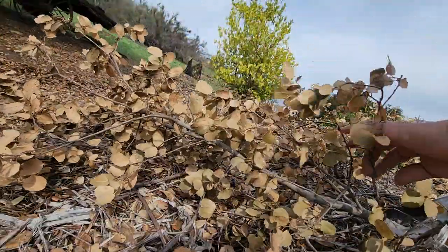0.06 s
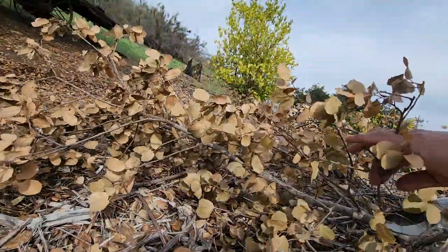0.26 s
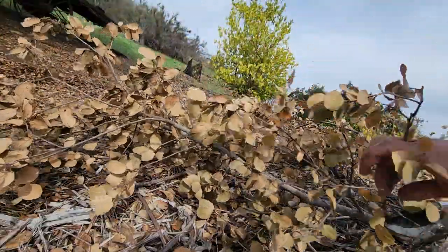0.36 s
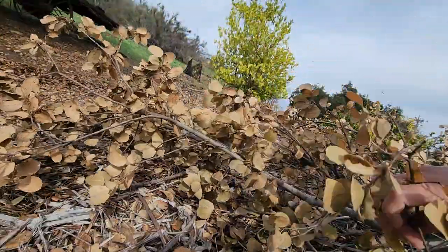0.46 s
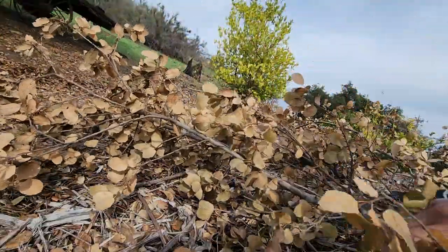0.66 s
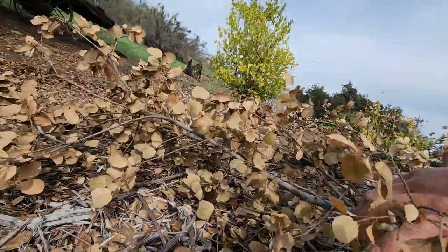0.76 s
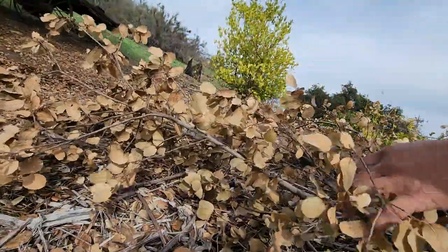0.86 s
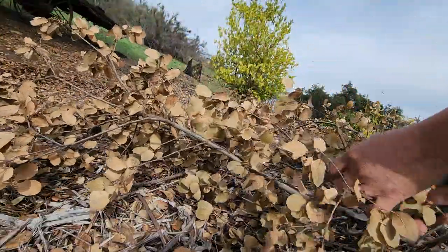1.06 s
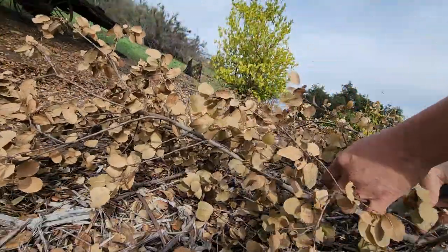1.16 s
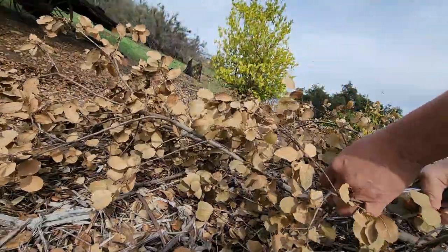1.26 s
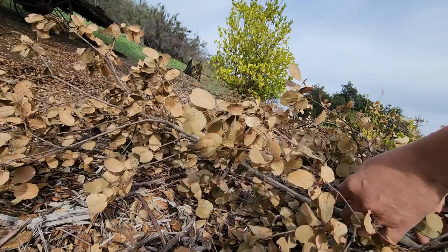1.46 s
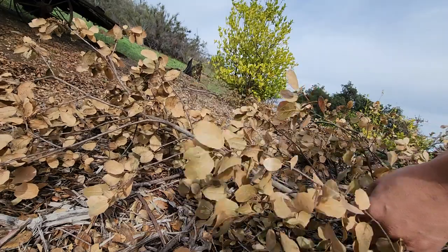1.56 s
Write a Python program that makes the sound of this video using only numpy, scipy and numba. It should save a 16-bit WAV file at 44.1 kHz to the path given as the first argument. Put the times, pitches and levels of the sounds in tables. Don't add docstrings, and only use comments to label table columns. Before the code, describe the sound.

Hand pruners work close by, slightly right, outdoors. Dry leaves rustle throughout in uneven stirs. A thin metallic squeak at 0.15-0.26 seconds ends in a click and tiny chirp near 0.3; a very sharp, bright snip cracks a twig at 0.39. A faint spring chirp follows around 0.63. A louder squeak at 1.11-1.17 ends in a snap, then light knocks and crackles, over faint distant rumble and soft wind puffs.

```python
import sys
import numpy as np
from scipy import signal
from scipy.fft import rfft, irfft
from scipy.io import wavfile
from scipy.ndimage import uniform_filter1d
from numba import njit

SR = 44100
rng = np.random.default_rng(int(sys.argv[2]) if len(sys.argv) > 2 else 0)


def to_wav(sig):
    pcm = np.clip(np.atleast_2d(sig), -1, 1) * 32767
    pcm = np.round(pcm).astype(np.int16)
    wavfile.write(sys.argv[1], SR, pcm.T)


def voltage_ratio(decibels):
    exponent = np.asarray(decibels, float) / 20
    return 10 ** exponent


N = 70560
T = np.arange(N) / SR
TOP_HZ = 15850

# frequency_hz, density_db (per Hz)
LEAF_SPECTRUM = [(160, -32), (280, -7), (631, -3.5), (760, -5), (1330, -1), (2940, -3.5), (7470, 0.5),
                 (15200, -3.5), (16000, 11.5)]
# time_s, level_db
LEAF_STIR = [(0, -47), (.07, -53), (.081, -56), (.09, -51.5), (.15, -50.5), (.255, -61), (.263, -68),
             (.282, -59.5), (.29, -41.5), (.37, -55), (.42, -45.5), (.55, -55), (.6, -45.5), (.72, -55.5),
             (.74, -66), (.79, -61), (.82, -59), (.9, -56.5), (.95, -59), (1.07, -54.5), (1.19, -48),
             (1.25, -58.5), (1.3, -55.5), (1.42, -58), (1.5, -48), (1.6, -49.5)]
# frequency_hz, density_db (per Hz)
RUMBLE_SPECTRUM = [(12, -34), (20, 4), (119, 3), (239, -10.5), (275, -19.5), (400, -26), (520, -72),
                   (880, -120)]
# time_s, level_db
RUMBLE_SWELL = [
    (0, 3.5),
    (.2, -2),
    (.45, 1.5),
    (.65, -1),
    (.95, -0.5),
    (1.1, 1.5),
    (1.3, -1),
    (1.6, -1),
]
# centre_s, left_peak_db, swing_hz, length_ms
PUFFS_AND_THUDS = [(.83, -42, 60, 14), (.92, -46, 50, 30), (1.1495, -29, 62, 9), (.404, -41, 150, 5),
                   (.3, -44, 150, 9), (.134, -42, 110, 12), (.98, -47, 155, 14), (.29, -50, 380, 5),
                   (.137, -53, 640, 5), (1.01, -60, 720, 7), (1.508, -52, 1300, 4), (1.366, -56, 2200, 5)]
# start_s, level_db, centre_hz, length_ms
LEAF_CRACKS = [(.0858, -43, 7150, 3.1), (.0914, -28.5, 9440, 1.87), (.3313, -38.5, 7400, 3),
               (.404, -49.5, 4250, 14), (.4195, -39, 7500, 4.4), (.4595, -42, 5770, 4.06),
               (1.005, -46, 6000, 2.9), (1.0635, -51.5, 3200, 3.4), (1.21, -51.5, 9000, 25),
               (1.3054, -48, 7960, 4.5), (1.3877, -47, 6800, 2), (1.4511, -52.5, 3250, 5.4),
               (1.471, -36, 6340, 1.3), (1.507, -56, 10000, 4.3), (1.58, -42, 6900, 3.2)]
# start_s, level_db, centre_hz, length_ms
HAND_SNAPS = [(.1262, -38, 10500, 8.4), (.134, -45, 2900, 6.9), (.166, -44, 6100, 3.7),
              (.24, -49, 9000, 22), (.381, -46, 4160, 17), (.285, -33, 8140, 8.8), (.296, -50, 4660, 11.5),
              (.3928, -43, 4250, 7.4), (.3952, -28, 6940, 1.9), (.5756, -48.5, 5430, 9.9),
              (.816, -50.5, 7740, 7.4), (.8695, -46, 6550, 6.4), (1.159, -26, 9000, 5),
              (1.173, -47, 6130, 4), (1.3508, -50, 8750, 5.9)]
# time_s, pitch_hz, level_db, third_partial_db, left_minus_right_db
PIVOT_OPENING = [
    (.15, 4680, -60, -20, -6),
    (.168, 4585, -32, -24, -6),
    (.184, 4830, -31, -13, -6),
    (.203, 4550, -31, -22, -8),
    (.211, 4450, -23, -21, -10),
    (.222, 4620, -28, -25, -7),
    (.241, 4580, -29, -21, -7),
    (.2465, 4570, -23, -26, -7),
    (.262, 4700, -58, -12, -6),
]
PIVOT_CATCH = [
    (.2955, 4900, -55, -16, -14),
    (.297, 4900, -33, -16, -12),
    (.2985, 4950, -42, -16, -10),
    (.302, 4880, -31, -14, -8),
    (.3035, 4950, -38, -14, -8),
    (.3055, 5050, -33, -12, -10),
    (.309, 5150, -42, -12, -12),
    (.319, 5220, -58, -10, -14),
]
PIVOT_CLOSING = [
    (1.11, 4440, -66, -18, -14),
    (1.114, 4460, -31, -18, -15),
    (1.128, 4660, -28, -32, -15),
    (1.142, 4480, -29, -16, -14),
    (1.147, 4390, -21, -12, -10),
    (1.158, 4440, -25, -30, -8),
    (1.161, 4700, -20, -40, -10),
    (1.1627, 4720, -10, -40, -11),
    (1.167, 4800, -30, -30, -12),
    (1.18, 4880, -52, -20, -8),
]
# time_s, level_db (relative to the first)
PIVOT_SECOND = [
    (.165, -27),
    (.18, -14),
    (.196, -19.5),
    (.207, -31),
    (.226, -32),
    (.255, -23),
    (.29, -26),
    (1.11, -21),
    (1.144, -13),
    (1.15, -29),
]
# time_s, mode_hz, level_db, left_minus_right_db
SQUEAL_FIRST = [
    (.376, 15520, -55, -30),
    (.379, 15600, -38, -30),
    (.3812, 15450, -43, -30),
    (.3885, 15450, -21, -11),
    (.3903, 15520, -25, -8),
    (.3936, 15480, -1, -18),
    (.3945, 14700, -20, -3),
    (.397, 15550, -21, -13),
    (.404, 15500, -46, -3),
]
SQUEAL_SECOND = [
    (1.143, 13250, -50, -10),
    (1.147, 13190, -27, -9),
    (1.157, 13285, -24, -7),
    (1.1612, 13200, -24, -7),
    (1.1643, 13090, -14, -11),
    (1.167, 13160, -38, -2),
    (1.176, 13200, -52, -2),
]
# time_s, pitch_hz, level_db
WOOD_BITE = [
    (.379, 1800, -56),
    (.386, 1910, -39),
    (.39, 2300, -41),
    (.393, 1850, -33),
    (.396, 2000, -25),
    (.399, 2400, -37),
    (.404, 2600, -52),
]
# time_s, mode_hz, level_db, left_minus_right_db
FAINT_OPENING = [
    (.198, 13150, -66, -8),
    (.211, 13400, -40, 0),
    (.222, 13150, -56, -8),
    (.25, 13300, -50, -15),
    (.26, 13100, -66, -8),
]
FAINT_CLOSING = [
    (1.112, 13300, -60, -10),
    (1.115, 13400, -42, -10),
    (1.121, 13200, -58, -12),
    (1.143, 13250, -52, -10),
]
# time_s, pitch_hz, level_db, left_minus_right_db
BLADE_GLIDE = [
    (1.1595, 10300, -45, -8),
    (1.161, 10250, -28, -8),
    (1.1628, 9500, -31, -8),
    (1.1648, 9050, -25, -8),
    (1.169, 9000, -50, -8),
]
# time_s, pitch_hz, level_db
SPRING_HIGH = [
    (.614, 7260, -66),
    (.62, 7230, -45),
    (.625, 7200, -64),
    (.637, 7130, -52),
    (.648, 7000, -49),
    (.657, 6930, -68),
]
SPRING_LOW = [
    (.63, 2250, -66),
    (.635, 2230, -52),
    (.643, 2150, -66),
]
# start_s, level_db
TWIG_BLOWS = [
    (.3927, -33),
    (.3953, -24),
    (.3966, -38),
    (.2853, -38),
    (1.3, -37),
]
# mode_hz, level_db, t60_s
TWIG_MODES = [(230, -12, .04), (470, -14, .016), (660, -15, .014), (1720, 2, .018), (2550, -6, .025),
              (3000, -6, .014), (3480, -3, .016), (4150, -4, .018), (5170, -6, .015), (6185, -14, .014),
              (7375, -3, .014), (9300, -9, .013), (12600, -9, .014), (14000, 2, .016)]


def level(x, db):
    return x * voltage_ratio(db) / np.sqrt(np.mean(x ** 2))


def curve(table, hz):
    table_hz, table_db = np.array(table).T
    return np.interp(np.log(np.minimum(hz, TOP_HZ - 900)), np.log(table_hz), table_db)


def over_time(table):
    return np.interp(T, *np.array(table).T)


def colour(x, gain):
    return irfft(rfft(x) * gain(np.maximum(np.fft.rfftfreq(N, 1 / SR), 1)), N)


def delay(x, lag_ms):
    return colour(x, lambda f: np.exp(-2j * np.pi * f * lag_ms / 1000))


def walk(rate_hz):
    hold = int(SR / rate_hz)
    steps = np.repeat(rng.standard_normal(N // hold + 1), hold)
    return 1.3 * uniform_filter1d(uniform_filter1d(steps, hold), hold)[:N]


@njit
def grains(at, hz, cycles, size, length, rate):
    out = np.zeros(length)
    for k in range(len(at)):
        turn = np.exp((2j * np.pi - 2 / cycles) * hz[k] / rate)
        z = size[k] + 0j
        for i in range(max(int(at[k]), 0), min(int(at[k] + 3 * cycles * rate / hz[k]), length)):
            out[i] += z.imag
            z *= turn
    return out


def leaf_ticks(patch_db, count=14000):
    u = rng.random((3, count))
    lag, shade = rng.standard_normal((2, count))
    at = u[0] * N
    hz = 300 * 54 ** u[1]
    scatter_db = -3 * np.log(1 - .997 * u[2])
    db = curve(LEAF_SPECTRUM, hz) + 20 * np.log10(hz) + scatter_db + patch_db[at.astype(int)]
    ports = []
    for side in (1, -1):
        size = np.sign(lag) * voltage_ratio(db + side * 2.5 * shade)
        ports.append(grains(at + 12 + side * 5 * lag, hz, 6, size, N, 1. * SR))
    return np.array(ports)


def leaf_hiss(patch_db):
    hiss = 0
    for centre in 350 * 2 ** np.arange(0, 5.6, .5):
        like = np.clip(700 / centre, .1, .7)
        mid, side = rng.standard_normal((2, N))
        pair = np.sqrt(1 + like) * mid + np.sqrt(1 - like) * side * np.array([[1], [-1]])

        def band_gain(f):
            octaves = np.clip(np.log2(f / centre), -.5, .5)
            return voltage_ratio(curve(LEAF_SPECTRUM, f)) * np.clip(np.cos(np.pi * octaves), 0, 1)

        flicker_db = 2.4 * walk(35)
        hiss = hiss + colour(pair, band_gain) * voltage_ratio(flicker_db + patch_db * .7)
    return hiss


def leaves():
    patch_db = 2 * walk(75.0)
    rustle = level(leaf_ticks(patch_db), -3.5) + level(leaf_hiss(patch_db), -3)
    return rustle * voltage_ratio(over_time(LEAF_STIR))


def rumble():
    noise = rng.standard_normal((2, N))
    mid, side = colour(noise, lambda f: voltage_ratio(curve(RUMBLE_SPECTRUM, f)) * (f > 18) * (f < 450))
    pair = mid + voltage_ratio(-14.5) * side * np.array([[1], [-1]])
    return level(pair * voltage_ratio(2 * walk(6.15) + over_time(RUMBLE_SWELL)), -52.5)


def puffs_and_thuds():
    left = np.zeros(N)
    for centre_s, peak_db, hz, ms in PUFFS_AND_THUDS:
        t = T - centre_s
        left -= voltage_ratio(peak_db) * np.exp(-(t * 1000 / ms) ** 2) * np.cos(2 * np.pi * hz * t)
    return left * voltage_ratio(np.array([[0], [-6.]]))


def cracks(table, pan_db, lag_ms, count=200):
    tab = np.array(table)[:, :, None]
    start_s, level_db, centre_hz, length_ms = (tab[:, k] for k in range(4))
    u = rng.random((len(tab), count))
    g = rng.standard_normal((len(tab), 4, count))
    at = (start_s - length_ms / 2000 * np.log(1 - .98 * u)) * SR
    hz = np.clip(centre_hz * 2 ** (.85 * g[:, 0]), 500, 17500)
    db = level_db + 3.5 * g[:, 1] - 10 * np.log10(count / length_ms / 8)
    db = db + 4 * np.log2(hz / centre_hz)
    shade_db = pan_db / 2 + 1.5 * g[:, 2]
    lag = lag_ms / 1000 * SR + 1.9 * g[:, 3]
    ports = []
    for side in (1, -1):
        arrival = at + lag * (side > 0)
        size = np.sign(g[:, 3]) * voltage_ratio(db + side * shade_db)
        ports.append(grains(arrival.ravel(), hz.ravel(), 4, size.ravel(), N, 1. * SR))
    return colour(np.array(ports), lambda f: f / np.hypot(f, 1000))


def squeak(table, lag_ms, partials=False, rough=0.97):
    tab = np.array(table)

    def column(k):
        return np.interp(T, tab[:, 0], tab[:, k])

    jitter = 1 + rough * .008 * walk(540)
    phase = 2 * np.pi * np.cumsum(column(1) * jitter) / SR
    tone = np.sin(phase)
    if partials:
        second_db = over_time(PIVOT_SECOND) + 3.5 * walk(90)
        third_db = column(3) + 3.5 * walk(200)
        tone = tone + voltage_ratio(second_db) * np.sin(2 * phase) + voltage_ratio(third_db) * np.sin(3 * phase)
        hiss = colour(rng.standard_normal(N), lambda f: np.exp(-np.log2(f / 9000) ** 2))
        tone = tone + level(hiss, -28) * voltage_ratio(2.3 * walk(150))
    sounding = (T > tab[0, 0]) * (T < tab[-1, 0])
    shimmer_db = rough * 1.2 * walk(600)
    right = np.sqrt(2) * tone * voltage_ratio(column(2) + shimmer_db) * sounding
    shade_db = column(-1) if tab.shape[1] > 3 else -2.2
    return np.array([delay(right, lag_ms) * voltage_ratio(shade_db), right])


def pivot():
    opening = squeak(PIVOT_OPENING, 0.547, True)
    catch = squeak(PIVOT_CATCH, 0.53, True, 1.2)
    return opening + catch + squeak(PIVOT_CLOSING, 0.27, True)


def blade():
    squeal = squeak(SQUEAL_FIRST, .26, rough=.4) + squeak(SQUEAL_SECOND, .256, rough=.6)
    faint = squeak(FAINT_OPENING, 0.23, rough=1.3) + squeak(FAINT_CLOSING, .26, rough=1.65)
    bite = squeak(WOOD_BITE, .355, rough=3)
    return squeal + faint + bite + squeak(BLADE_GLIDE, 0.263, rough=1.47)


def knock():
    mode_hz, mode_db, t60_s = np.array(TWIG_MODES).T[:, :, None]
    right = np.zeros(N)
    for start_s, blow_db in TWIG_BLOWS:
        chance = rng.standard_normal((len(TWIG_MODES), 2))
        t = np.maximum(T - start_s, 0)
        rise = 1 - np.exp(-t / .0004)
        decay = np.exp(-np.log(1000) * t / t60_s)
        hz = mode_hz * (1 + 0.016 * chance[:, 1:])
        strength = voltage_ratio(blow_db + mode_db + 2 * chance[:, :1])
        right = right + np.sum(strength * rise * decay * np.sin(2 * np.pi * hz * t), axis=0)
    return np.array([delay(right, 0.247) * voltage_ratio(1.0), right])


def spring():
    return squeak(SPRING_HIGH, 0.11) + squeak(SPRING_LOW, 0.083, rough=1.56)


def brush_scatter(near):
    t = T[:int(.15 * SR)]
    tail = rng.standard_normal((2, len(t))) * np.exp(-np.log(1000) * t / .08) * (t > .003)
    tail = tail / np.sqrt(np.sum(tail ** 2, axis=1, keepdims=True))
    return voltage_ratio(-24) * signal.fftconvolve(near.mean(axis=0)[None], tail, axes=1)[:, :N]


def scene():
    crackle = cracks(LEAF_CRACKS, 0.26, 0.067) + cracks(HAND_SNAPS, -3.3, .2)
    near = crackle + pivot() + blade() + knock() + spring()
    return near + brush_scatter(near) + leaves() + rumble() + puffs_and_thuds()


def top_cut(x):
    return signal.sosfilt(signal.butter(12, 16960, fs=SR, output="sos"), x)


def record(dry):
    mix = colour(dry, lambda f: 1 / (1 + (f / TOP_HZ) ** 200))
    return top_cut(mix)


dry = scene()
out = record(dry)
to_wav(out)
```